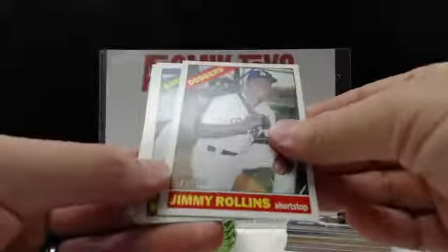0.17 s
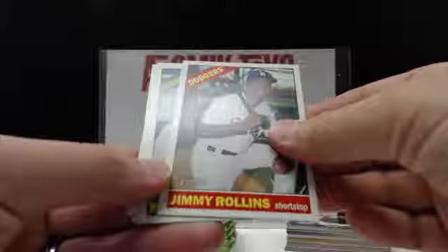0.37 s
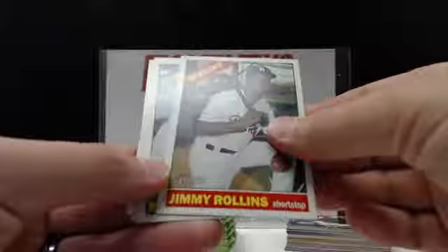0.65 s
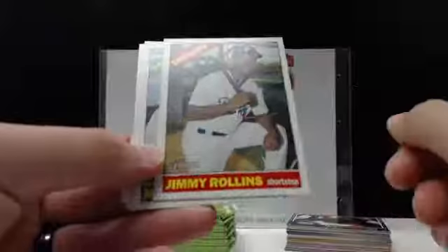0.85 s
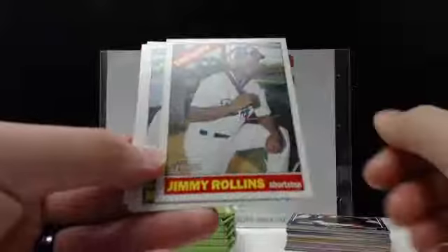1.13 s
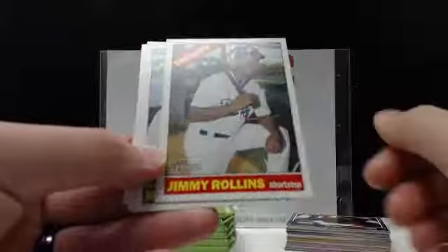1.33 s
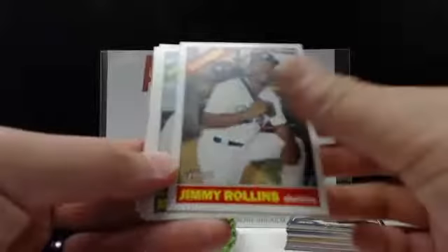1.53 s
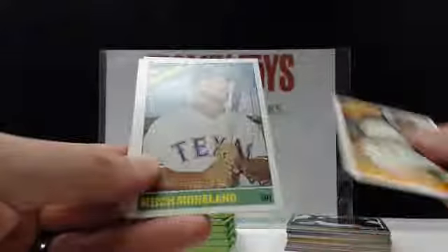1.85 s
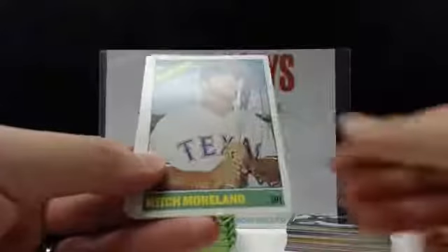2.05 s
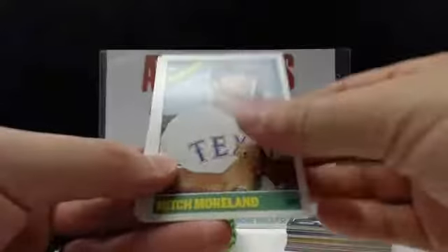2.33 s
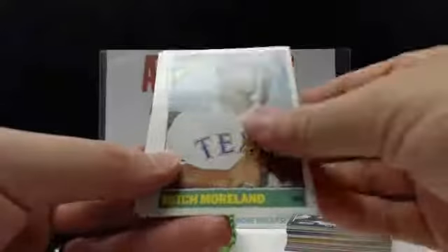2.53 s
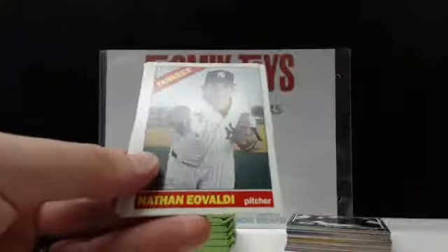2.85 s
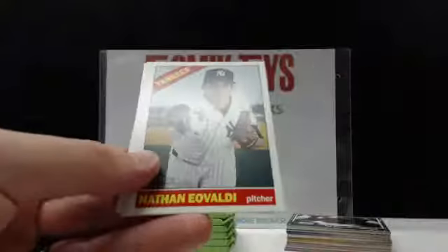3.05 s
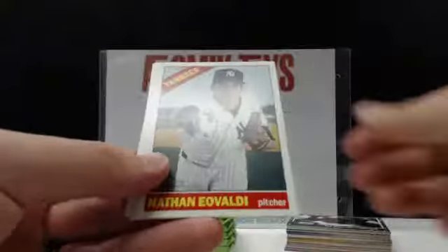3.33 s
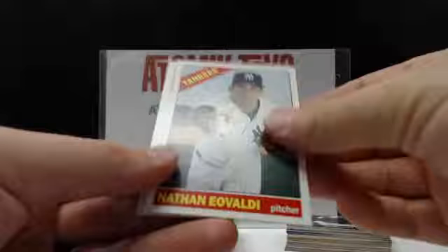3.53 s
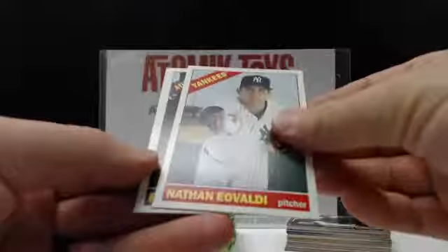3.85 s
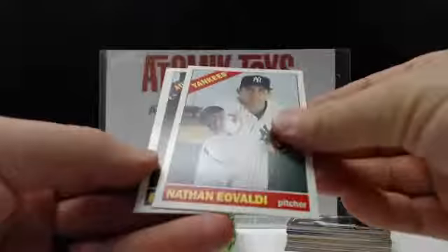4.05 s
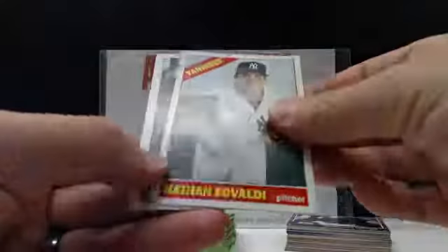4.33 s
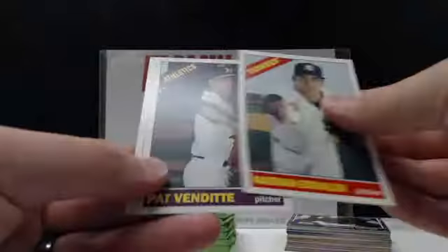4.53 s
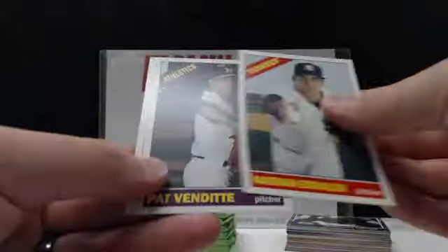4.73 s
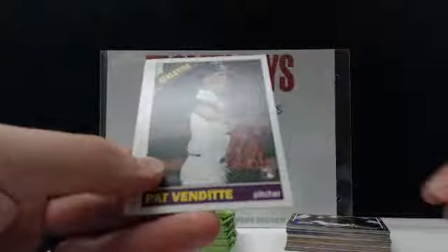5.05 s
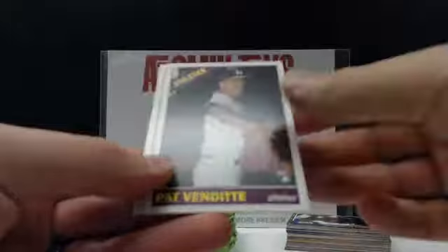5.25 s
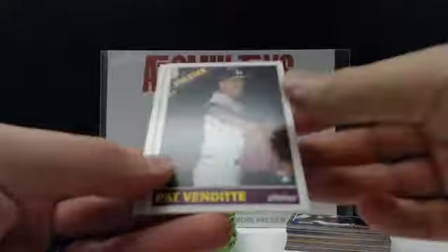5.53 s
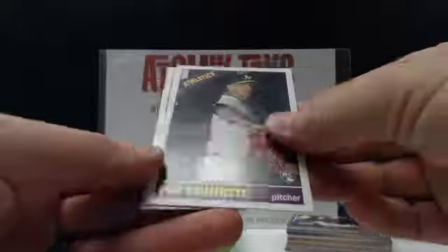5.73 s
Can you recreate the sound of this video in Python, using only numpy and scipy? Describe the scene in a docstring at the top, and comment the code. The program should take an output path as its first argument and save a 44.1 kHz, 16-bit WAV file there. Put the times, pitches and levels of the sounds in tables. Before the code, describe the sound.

Close papery flicks, brief rubs and dry clicks of cards being handled one by one, with a low unsteady hum and soft rumble behind.

```python
"""Stiff trading cards are thumbed off a hand-held stack, close to a small microphone in a quiet room.
Each card hisses as it slides (dense random slips) and snaps as its edge clears the stack (a blow and a
dying flutter through the card's resonances); some are laid aside with dry clicks (short ringing modes).
Short rasps and soft damped thumps go with the handling; thin sharp digital ticks (decaying steps) break in.
Behind them a motor hums low and drifts slowly in pitch (wavering sines) over rumble, fan noise and fizz."""
import sys
import numpy as np
from scipy import signal
from scipy.fft import rfft, irfft
from scipy.io import wavfile
from scipy.ndimage import uniform_filter1d

SR = 44100
rng = np.random.default_rng(int(sys.argv[2]) if len(sys.argv) > 2 else 0)


def log_audio(samples):
    """Write samples as a 16-bit WAV file to the path given in sys.argv[1]."""
    # one column per channel
    frames = np.atleast_2d(samples).T
    # limit to full scale, then quantise
    limited = np.clip(frames, -1, 1)
    pcm = np.round(limited * 32767).astype(np.int16)
    wavfile.write(sys.argv[1], SR, pcm)


N = 259213
TIME_S = np.arange(N) / SR
FREQS_HZ = np.fft.rfftfreq(N, 1 / SR)


def amp(db):
    """Decibels to gain."""
    return 10 ** (np.asarray(db) / 20)


def unit(x):
    """Scales to rms 1."""
    return x / np.sqrt(np.mean(x ** 2) + 1e-20)


def read(points, hz):
    """Reads a spectrum table on a log-frequency axis."""
    f, value = np.transpose(points)
    return np.interp(np.log(hz + 1), np.log(f + 1), value)


def add(mix, start_s, sound):
    """Mixes a sound in at its start time."""
    part = mix[round(start_s * SR):][:len(sound)]
    part += sound[:len(part)]


def coloured(x, points):
    """Gives a whole track a spectrum, at rms 1."""
    return unit(irfft(rfft(x) * amp(read(points, FREQS_HZ)), N))


def resonance(hz, centre_hz, width_hz):
    """Gain of one resonance: 1 at the centre, half at the edges of its width."""
    return 1 / (1 + (2 * (hz - centre_hz) / width_hz) ** 2)


def drift(rate_hz):
    """Slow chance up to a rate, at rms 1."""
    noise = rfft(rng.standard_normal(N))
    return unit(irfft(noise / (1 + (FREQS_HZ / rate_hz) ** 4), N))


def causal(gain):
    """Minimum-phase response of a gain curve: nothing sounds before the blow."""
    log_gain = np.log(np.maximum(gain, 1e-5))
    circle = np.concatenate([log_gain, log_gain[-2:0:-1]])
    return np.exp(np.conj(signal.hilbert(circle)))[:len(gain)]


def air(air_db=-54.5, rumble_db=-55, fizz_db=-101):
    """Room rumble, fan noise with faint tones in it, and the microphone's own fizz."""
    # Spectra, each row: frequency in Hz, relative density in dB per Hz.
    fan_spectrum = [(110, -18.5), (180, -4.5), (235, -9), (300, -3.5), (400, -13), (500, -12), (600, -21.5),
                    (680, -11.5), (745, -16.5), (1150, -22), (1600, -26.5), (2500, -32.5), (2750, -38),
                    (4500, -40), (6300, -42.5), (6750, -41), (7400, -55.5), (8600, -67.5), (11000, -98)]
    rumble_spectrum = [(8, -26), (22, -1.5), (35, 13), (50, 0.5), (75, 3), (115, 10), (170, 5), (205, -9.5),
                       (260, -55.5)]
    fizz_spectrum = [(5000, -21.5), (8000, -4.5), (14000, -15.5), (14600, 7.5), (15800, 12)]
    # Faint fan tones. Each row: frequency in Hz, width in Hz, level in dB rms.
    whines = [(298, 12, -63.5), (682.3, 13, -71), (968.3, 20, -73.5), (1810, 48, -88), (2925, 5.9, -89.5)]
    out = amp(air_db) * coloured(rng.standard_normal(N), fan_spectrum)
    out += amp(rumble_db) * coloured(rng.standard_normal(N), rumble_spectrum)
    out += amp(fizz_db) * coloured(rng.standard_normal(N), fizz_spectrum)
    for hz, width_hz, db in whines:
        noise = rfft(rng.standard_normal(N))
        out += amp(db) * unit(irfft(noise * resonance(FREQS_HZ, hz, width_hz), N))
    return out


def tone(hz, db, waver_db=0.74, waver_hz=5.2):
    """A sine on a pitch, its level wavering slightly about an rms level."""
    turns = np.cumsum(hz * np.ones(N)) / SR + rng.random()
    level = amp(db + waver_db * drift(waver_hz))
    return np.sqrt(2) * level * np.sin(2 * np.pi * turns)


def hum(throb_hz=103.8):
    """Two orders of one motor swell and fade as its speed drifts; a neighbour beats against the lower."""
    # Motor. Each row: time in s, speed in turns per s, second order in dB rms, third order in dB rms.
    motor = [(0.04, 47.7, -45.5, -58), (0.48, 47.3, -61.5, -54), (0.7, 52, -54.5, -52.5),
             (0.91, 45.6, -66, -46.5), (1.2, 46.4, -45.5, -53.5), (1.59, 45.7, -47.5, -56.5),
             (2.49, 45.2, -46.5, -55.5), (2.61, 42.6, -52.5, -54), (2.71, 48.3, -45, -51),
             (3.14, 47.3, -61.5, -54.5), (3.42, 47, -51.5, -53.5), (3.71, 47.8, -54, -47),
             (4.24, 46.5, -46, -58.5), (4.59, 48.7, -48, -60), (4.68, 47, -49, -57.5),
             (5.03, 44.6, -49, -52.5), (5.26, 46.5, -45, -57.5), (5.84, 47, -49.5, -58.5)]
    # Spells of the neighbouring tone. Each row: middle in s, half length in s, level in dB rms.
    throbs = [(.68, 0.16, -59), (4.33, 0.41, -53.5)]
    time_s, *columns = np.transpose(motor)
    speed, second_db, third_db = (np.interp(TIME_S, time_s, column) for column in columns)
    orders = tone(2 * speed, second_db) + tone(3 * speed, third_db)
    throb = sum(amp(db) * np.exp(-((TIME_S - middle_s) / half_s) ** 2) for middle_s, half_s, db in throbs)
    return orders + throb * tone(throb_hz, 0)


def room(x, onset_s=0.0047):
    """A small furnished room: a diffuse tail, each band dying at its own speed."""
    # Decay. Each row: frequency in Hz, t60 in s.
    decay = [(150, 0.59), (1000, 0.25), (4000, 0.27), (8000, 0.22)]
    hz, t, bands = signal.stft(rng.standard_normal(SR // 2), SR, nperseg=256)
    fall = amp(-60 * t / read(decay, hz)[:, None])
    tail = signal.istft(bands * fall * (1 - np.exp(-t / onset_s)), SR, nperseg=256)[1]
    return signal.fftconvolve(x, tail / np.linalg.norm(tail))[:N]


def ticks(fall_s=0.0039):
    """Digital glitches: tiny sudden steps that reach far up the treble."""
    # Thin sharp ticks. Each row: start in s, peak in dB.
    tick_rows = [(0.0256, -43.5), (.6335, -50), (0.6761, -41.5), (1.31, -41), (1.9762, -40), (2.5797, -37),
                 (2.627, -51), (5.193, -49), (5.2269, -39), (5.861, -40.5)]
    out, t = np.zeros(N), np.arange(SR // 100) / SR
    for start_s, db in tick_rows:
        add(out, start_s, amp(db) * np.exp(-t / fall_s))
    return out


def thumps(rise_s=0.0013, t60_cycles=4.8):
    """Low, heavily damped pushes of the hands and the flexing card; the deeper, the longer."""
    # Soft thumps. Each row: start in s, peak in dB, pitch in Hz.
    thump_rows = [(0.043, -41, 90), (1.21, -36.5, 96), (1.65, -35, 165), (1.7081, -26.5, 287),
                  (1.712, -23.5, 104.4), (1.72, -27.5, 172), (1.722, -32, 49.7), (2.142, -39, 69.7),
                  (2.769, -30, 190), (2.836, -39, 113), (2.84, -38.5, 42.2), (2.848, -37, 179),
                  (4.697, -31, 255), (5.169, -36.5, 110)]
    out, t = np.zeros(N), np.arange(SR // 4) / SR
    for start_s, db, hz in thump_rows:
        fall = amp(-60 * t * hz / t60_cycles)
        push = np.sin(2 * np.pi * hz * t) * fall * (1 - np.exp(-t / rise_s))
        add(out, start_s, amp(db) * push / abs(push).max())
    return out


def clicks(rasp=0.24, rasp_fall_s=0.0018, detune=0.007, crack=1.3):
    """A brief scratchy touch rings the same few short modes, a little differently each time."""
    # Clicks as a card is laid aside. Each row: start in s, peak in dB, modes above 3 kHz in dB.
    click_rows = [(1.0427, -38, 0), (1.0448, -39, 1), (1.057, -45, -10), (1.0801, -31.5, 0),
                  (1.0819, -37, 2), (1.0891, -35.5, 2), (1.1033, -48, -12), (1.1195, -43, -8),
                  (1.121, -39.5, -8), (4.996, -51, -6), (5.003, -45.5, -8), (5.017, -48, -12),
                  (5.0405, -32.5, 1.5), (5.0432, -39, -7), (5.049, -37, -2), (5.058, -42.5, -8),
                  (5.077, -42.5, -4), (5.0808, -41.5, -15)]
    # What the clicks ring with. Each row: frequency in Hz, level in dB, t60 in s.
    modes = [(1206, 0, 0.01), (1570, 1.5, 0.013), (2020, -6, 0.012), (2465, -3.5, 0.023), (3400, -4, 0.005),
             (4160, 2, 0.0088), (4650, -1, 0.0065), (5060, 0.5, 0.01)]
    # Overall colour. Each row: frequency in Hz, gain in dB.
    colour_points = [(300, -46), (800, -5), (1200, 10.5), (5600, -5.5), (6400, -16), (7500, -25),
                     (9000, -42.5)]
    out, t = np.zeros(N), np.arange(4096) / SR
    colour = causal(amp(read(colour_points, np.fft.rfftfreq(len(t), 1 / SR))))
    for start_s, db, high_db in click_rows:
        ring = np.zeros(len(t))
        for hz, mode_db, t60_s in modes:
            mode_hz = hz * (1 + detune * rng.standard_normal())
            level = amp(mode_db + high_db * (hz > 3000) - 60 * t / t60_s)
            ring += level * np.cos(2 * np.pi * mode_hz * t)
        touch = rasp * rng.standard_normal(len(t)) * np.exp(-t / rasp_fall_s)
        touch[0] += 1
        # crack: part of the touch heard directly, without the modes
        click = irfft((rfft(ring) + crack) * rfft(touch) * colour)
        add(out, start_s, amp(db) * click / abs(click).max())
    return out


def friction(grains_per_s=1300, spread_db=1.2, smooth=0.65, judder_db=2.0, judder_hz=110):
    """Paper fibres catch and let go: dense tiny slips, bunched by the unsteady thumb."""
    happens = rng.random(N) < grains_per_s / SR
    size = amp(spread_db * np.minimum(rng.exponential(1, N), 4))
    slips = happens * size * np.sign(rng.standard_normal(N))
    return (unit(slips) + smooth * rng.standard_normal(N)) * amp(judder_db * drift(judder_hz))


def rasps():
    """Short rasping noise bursts, each through one resonance; some add colour to a snap."""
    # Rasps. Each row: start in s, length in s, level in dB rms before the fades, pitch in Hz, width in Hz.
    rasp_rows = [(0.167, .009, -63.5, 3500, 4000), (1.31, .017, -45.5, 1250, 199),
                 (1.345, 0.032, -47.5, 1240, 200), (1.691, 0.021, -45.5, 2730, 2500),
                 (2.433, 0.065, -60.5, 1640, 400), (2.801, 0.019, -54, 2800, 500),
                 (2.8217, .0034, -35, 5400, 1330), (2.82, 0.0093, -38, 685, 220),
                 (2.826, 0.01, -44.5, 1350, 220), (4.266, 0.043, -54, 1090, 1600),
                 (4.348, .016, -54, 3000, 2000), (4.6947, .0078, -44.5, 830, 260),
                 (4.695, 0.004, -36, 3480, 500), (5.672, 0.0058, -56, 3530, 1103)]
    out, rub = np.zeros(N), rfft(friction())
    treble_cut = 1 / (1 + (FREQS_HZ / 7200) ** 24)
    for start_s, length_s, db, hz, width_hz in rasp_rows:
        ring = irfft(rub * resonance(FREQS_HZ, hz, width_hz) * treble_cut, N)
        burst = unit(ring[round(start_s * SR):][:round(length_s * SR)])
        add(out, start_s, amp(db) * burst * signal.windows.tukey(len(burst), .5))
    return out


def wander(x, patchy_db=2.0):
    """The contact moves over the card, so narrow bands briefly swell and fade."""
    bands = signal.stft(x, nperseg=512, noverlap=384)[2]
    patches = uniform_filter1d(rng.standard_normal(bands.shape), size=3, axis=0)  # over frequency
    patches = unit(uniform_filter1d(patches, size=9, axis=1))  # over time
    return unit(signal.istft(bands * amp(patchy_db * patches), nperseg=512, noverlap=384)[1][:N])


def slides(grip_s=.013, release_s=0.0098, swell_db_per_s=37.5, press_db_per_s=43.5):
    """A stroke takes hold, swells, lets go: a light one hisses, a firm one also drives the card's body."""
    # Strokes of card on card. Each row: start in s, length in s, hiss at the end in dB,
    # pressure as body level at the end in dB against the hiss.
    stroke_rows = [(0.142, 0.026, -66.5, 0), (1.203, 0.17, -54, 4), (1.38, 0.12, -72, -0.5),
                   (1.547, 0.13, -70, -8), (1.665, 0.049, -55, 8), (2.202, 0.051, -60, -16),
                   (2.293, 0.13, -61.5, -1), (2.407, 0.034, -53.5, 1.5), (2.435, 0.053, -59.5, 7),
                   (2.557, 0.12, -66, -13), (2.75, 0.11, -66, -1), (3.277, 0.066, -72, -7),
                   (3.37, .07, -69, 0), (3.992, .015, -70.5, 3), (4.116, 0.032, -66.5, 2),
                   (4.165, 0.097, -68, -1), (4.223, 0.14, -55.5, 2), (4.416, .014, -66.5, -6),
                   (4.455, .014, -65.5, -6), (4.59, .1, -70.5, 0), (4.697, 0.075, -66, 4.5),
                   (5.168, 0.021, -67, -4), (5.814, 0.017, -69, -5)]
    # Spectra, each row: frequency in Hz, relative density in dB per Hz.
    hiss_spectrum = [(1000, -32), (2400, -14), (3300, -3.5), (4200, -3.5), (5300, 2), (6600, -4.5),
                     (7300, -11.5), (8200, -26.5), (8800, -38), (11000, -71)]
    body_spectrum = [(200, -28.5), (450, -9.5), (670, 7.5), (950, -8), (1250, 0.5), (1480, -11.5),
                     (1750, -0.5), (2100, -11), (2600, -2.5), (3400, -14.5), (4600, -15), (7000, -55)]
    hiss_power, body_power, t = np.zeros(N), np.zeros(N), np.arange(SR // 2) / SR
    for start_s, length_s, db, pressure_db in stroke_rows:
        to_go_s, after_s = np.maximum(length_s - t, 0), np.maximum(t - length_s, 0)
        # the card speeds up and the thumb bears down along the stroke
        swell = amp(db - swell_db_per_s * to_go_s)
        stroke = np.minimum(t / grip_s, 1) * swell * np.exp(-after_s / release_s)
        pressure = amp(pressure_db - press_db_per_s * to_go_s)
        add(hiss_power, start_s, stroke ** 2)
        add(body_power, start_s, (stroke * pressure) ** 2)
    rub = wander(friction())
    hiss = np.sqrt(hiss_power) * coloured(rub, hiss_spectrum)
    body = np.sqrt(body_power) * coloured(rub, body_spectrum)
    return hiss + body


def snaps(flutter=0.19, level_db=-4.5, lows_db=2, highs_db=2, size=8192):
    """A snap is one blow and a quickly dying flutter of the edge, both ringing in the card."""
    # An edge snaps free or knocks the stack. Each row: start in s, middle-band peak in dB before level_db,
    # lows and highs in dB against the middle before lows_db and highs_db, flutter t60 in s,
    # bend as a factor on the card's resonances.
    snap_rows = [(1.2077, -41.5, 3.5, 7, .007, 0.97), (1.2127, -43.5, 4, -12.5, .022, 0.8),
                 (1.6487, -37, 0.5, -11, 0.038, 1.07), (1.674, -23, -6.5, -8.5, 0.034, 1.03),
                 (1.7069, -34, 4, 1, 0.021, 0.93), (2.141, -53, 12, 4, 0.033, 1.03),
                 (2.3927, -51, 4, 2, 0.015, 1), (2.7693, -34.5, 1, -20, 0.024, 0.97),
                 (2.78, -40.5, -1, -20, .026, 1), (2.7877, -38, 1, -12, 0.029, 1.04),
                 (2.805, -43.5, -3, 1.5, 0.025, 0.89), (2.822, -37.5, 5, 9, 0.025, 0.96),
                 (2.825, -38.5, -2, 1.5, 0.036, .94), (2.8315, -42, 10, 1, 0.041, 1.2),
                 (3.274, -53.5, 9, -0.5, .035, 0.92), (3.881, -52.5, -3, -7, .035, 1.18),
                 (4.375, -43, -1, -7, 0.027, 0.86), (4.647, -47.5, 4.5, -13, .03, 0.97),
                 (4.6951, -28.5, 2, -2.5, 0.023, 1.14), (4.6966, -22.5, -6, -14, 0.027, 1.06),
                 (4.7464, -40, 4.5, -11, .033, 1), (5.1698, -48.5, 6, 1, .022, 0.91),
                 (5.5024, -53, -3, -4.5, 0.027, 0.86), (5.674, -49.5, 12.5, -8, .03, 1.05)]
    # Card resonances. Each row: frequency in Hz, width in Hz, level in dB.
    card_modes = [(685, 66, -13), (1283, 173, 4.5), (1724, 180, -2.5), (2115, 400, -3.5), (3165, 180, -1.5),
                  (3570, 110, -14.5), (4380, 310, -11.5), (4870, 610, -10.5), (6130, 400, -16)]
    # Colour beneath the resonances. Each row: frequency in Hz, gain in dB.
    colour_points = [(100, -5), (200, -2.5), (450, -6), (850, -7.5), (1050, -14.5), (1500, -13),
                     (2300, -3.5), (2750, -23.5), (3500, -10.5), (4300, -26.5), (5500, -18), (6700, -21),
                     (8350, -39.5), (8750, -63)]
    out, t, hz = np.zeros(N), np.arange(size) / SR, np.fft.rfftfreq(size, 1 / SR)
    low, high = 1 / (1 + (hz / 900) ** 6), 1 - 1 / (1 + (hz / 3000) ** 8)
    middle = 1 - low - high
    for start_s, db, low_db, high_db, t60_s, bend in snap_rows:
        # bending stiffens the card and lifts its resonances
        rings = sum(amp(mode_db) * resonance(hz, f * bend, width_hz) for f, width_hz, mode_db in card_modes)
        card = amp(read(colour_points, hz)) + rings / (1 + (hz / 7000) ** 20)
        blow = flutter * rng.standard_normal(size) * amp(-60 * t / t60_s)
        blow[0] += 1
        blow = rfft(blow)
        # each band is levelled, then given its share
        shares = ((low, low_db + lows_db), (middle, 0), (high, high_db + highs_db))
        colour = card * sum(band * amp(share_db) / np.linalg.norm(band * card * blow)
                            for band, share_db in shares)
        snap = blow * causal(colour)
        peak = np.sqrt(uniform_filter1d(irfft(snap * middle) ** 2, size=64).max())  # short-time rms
        add(out, start_s, amp(db + level_db) * irfft(snap) / peak)
    return out


def scene(snap_room_db=-14, click_room_db=-22, slide_room_db=-16):
    """Cards close by, their faint room tail, the ticks and the background."""
    snap, click, slide = snaps() + thumps(), clicks(), slides() + rasps()
    tail = room(amp(snap_room_db) * snap + amp(click_room_db) * click + amp(slide_room_db) * slide)
    return (snap + click + slide + tail + ticks() + hum() + air())[None]


def record(dry, edge_hz=15830):
    """The recorder's band limit: a steep linear-phase low-pass."""
    low_pass = signal.firwin(511, edge_hz, window=("kaiser", 9), fs=SR)
    return signal.oaconvolve(dry, low_pass[None], "same")


dry = scene()
out = record(dry)
log_audio(out)
```